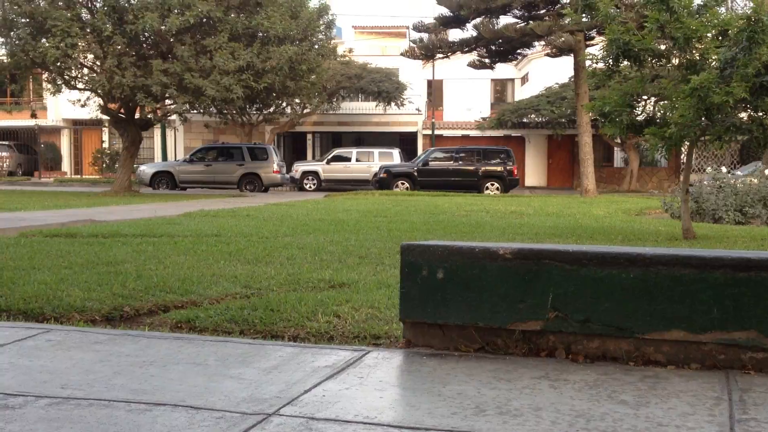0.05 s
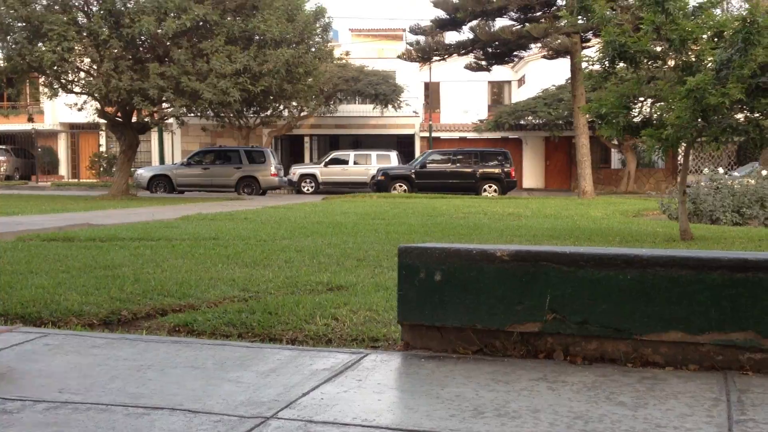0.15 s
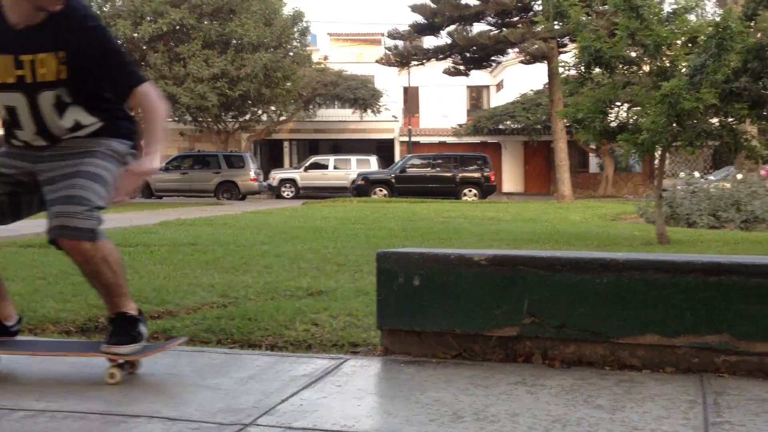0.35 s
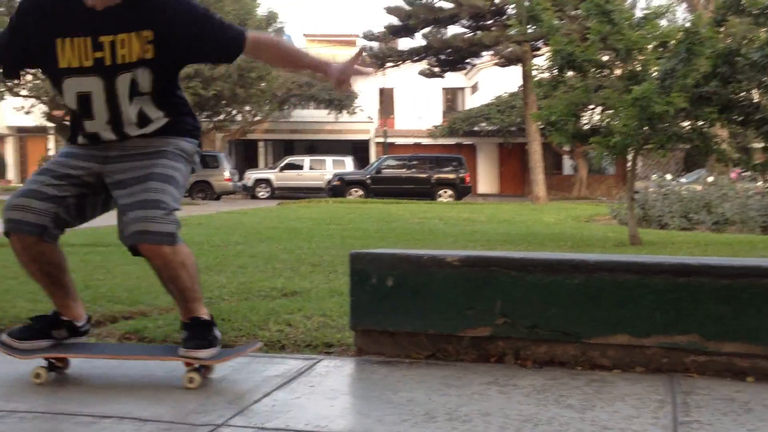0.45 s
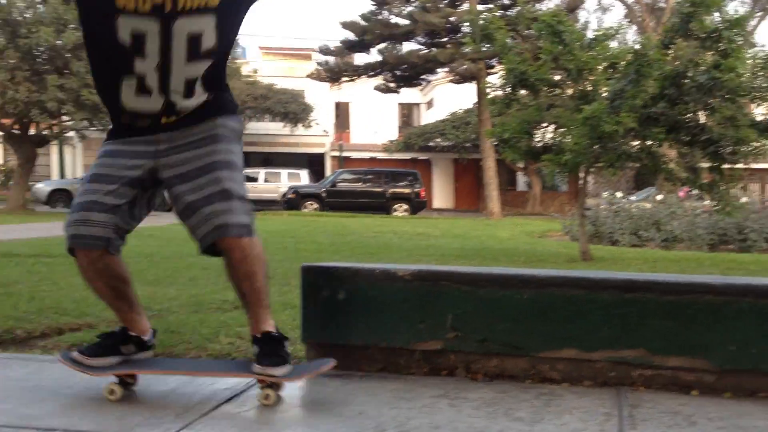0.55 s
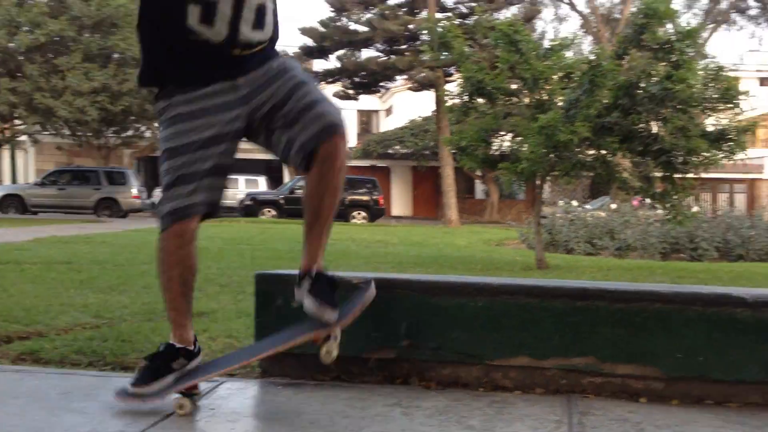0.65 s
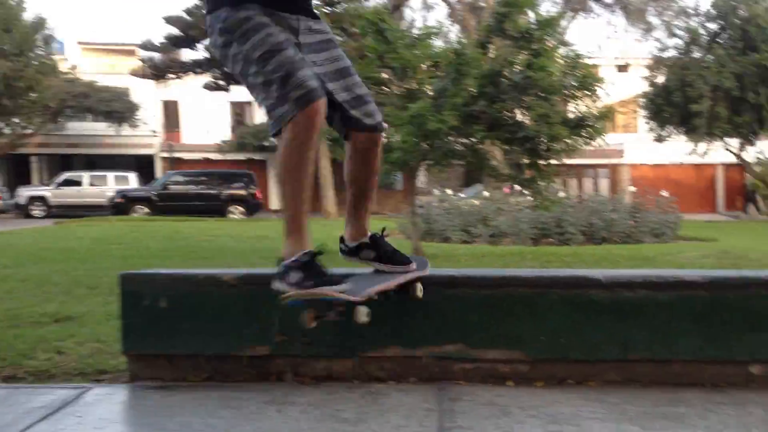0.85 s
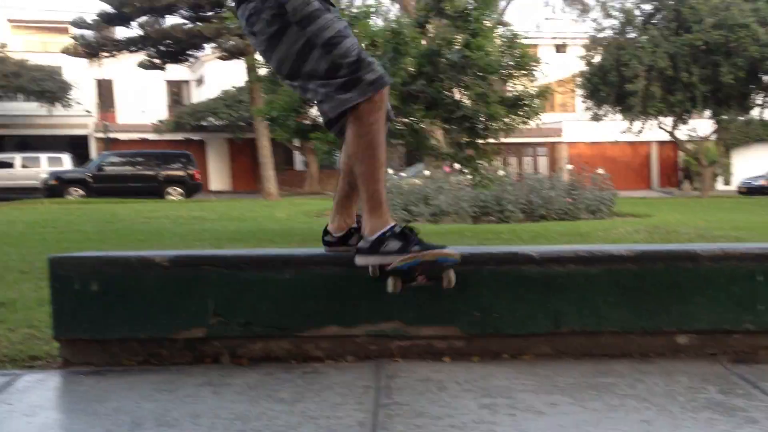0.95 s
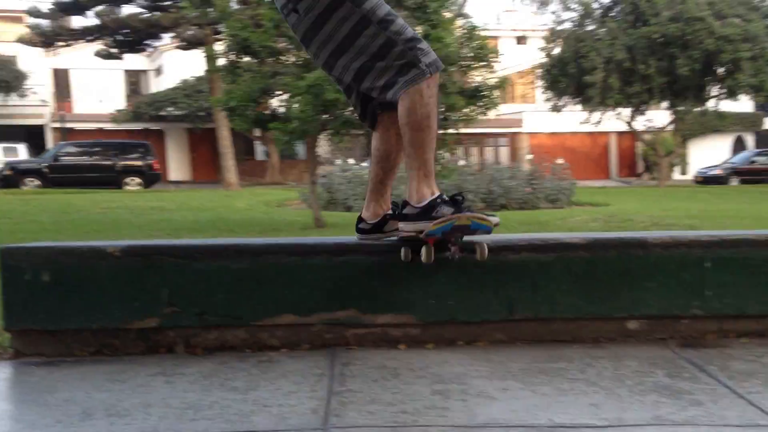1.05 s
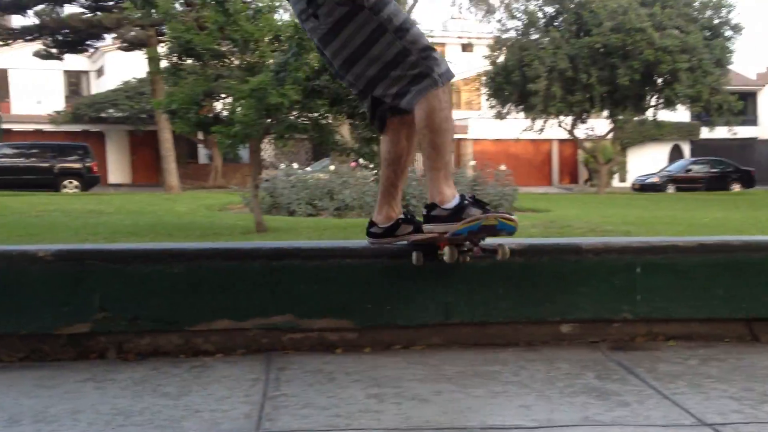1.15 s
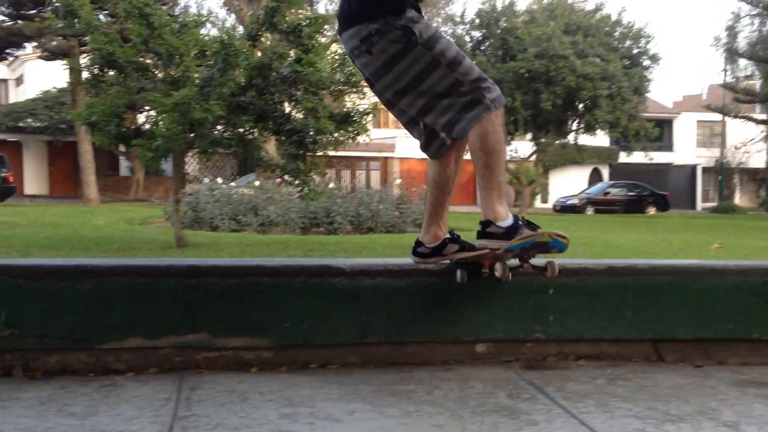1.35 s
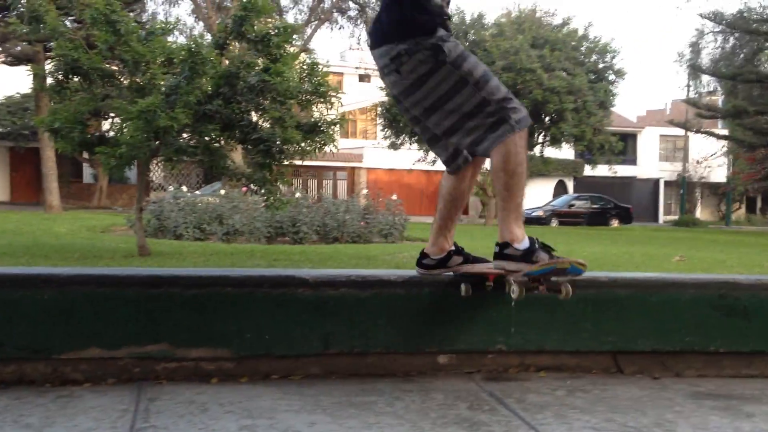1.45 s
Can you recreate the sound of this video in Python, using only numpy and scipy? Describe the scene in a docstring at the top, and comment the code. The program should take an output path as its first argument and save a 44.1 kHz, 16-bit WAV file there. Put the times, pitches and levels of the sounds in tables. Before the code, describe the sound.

Skateboard wheels roar and clack, the board cracks upward and grinds along a ledge.

```python
"""In a quiet park with a few faint, bird-like chirps, a skateboard rolls in over paving slabs.
Its hard wheels roar on the rough stone and clack across the joints, making the wooden deck ring.
The rider stamps on the tail (the back end), which pops on the ground, and the board flies for a moment.
It lands on a concrete ledge and scrapes along it, its trucks (the metal axles) knocking and rattling."""
import sys
import numpy as np
from scipy import signal
from scipy.fft import rfft, irfft, next_fast_len
from scipy.io import wavfile
from scipy.ndimage import map_coordinates

SR = 44100
rng = np.random.default_rng(int(sys.argv[2]) if len(sys.argv) > 2 else 0)


def to_wav(s):
    """Save 16-bit WAV."""
    ch = np.atleast_2d(s).T  # columns
    pcm = np.round(np.clip(ch, -1, 1) * 32767)  # PCM
    wavfile.write(sys.argv[1], SR, pcm.astype(np.int16))


N = 66150
T = np.arange(SR // 2) / SR  # time within one hit or echo, in seconds

# Tone of the park's steady hush: f/Hz, level/dB
PARK_TONE = [(40, -61), (90, -6), (130, -5.5), (240, -9), (340, -26), (450, -32), (600, -12.5),
             (1000, -4.5), (1600, -10), (2100, -4.5), (3500, -14), (5600, -25), (15500, -28)]
# Chirps: t/s, length/s, first f/Hz, last f/Hz, level/dB
CHIRPS = [(0.458, 0.059, 4360, 2370, -54), (1.31, 0.051, 4430, 3320, -58.5),
          (1.443, 0.012, 5340, 5970, -53.5)]
# Fading of the outdoor echo (t60 is the time to fall by 60 dB): f/Hz, t60/s
ECHO_DECAY = [(200, 0.15), (12000, 0.41)]
# Loudness of the wheels' roar and of their low rumble: t/s, level/dB
ROAR_LEVEL = [(0, -47.5), (.12, -45.5), (.3, -43), (.45, -44.5), (.55, -38.5), (.62, -42.5), (.69, -36),
              (.73, -44.5), (.8, -66), (.89, -49.5), (.92, -51)]
RUMBLE_LEVEL = [(0, -49.5), (.1, -53), (.3, -49.5), (.5, -58), (.6, -50.5), (.68, -66)]
# Tone of that roar and rumble: f/Hz, level/dB
ROAR_TONE = [(100, -45), (230, -5.5), (400, -10.5), (560, -2), (750, -5), (950, 0), (1250, -1.5),
             (1650, -1), (2050, -12), (2400, -12), (2800, -21), (4200, -26.5), (5300, -22), (7300, -17.5),
             (13000, -29), (15500, -19)]
RUMBLE_TONE = [(40, -15), (90, -25), (130, -1), (175, 2.5), (240, -8), (330, -19), (700, -59)]
# Loudness of the scrape along the ledge: t/s, level/dB
SLIDE_LEVEL = [(.89, -73), (.91, -37.5), (1.0, -47), (1.03, -50.5), (1.08, -47), (1.23, -44.5), (1.27, -52),
               (1.33, -49), (1.38, -50.5), (1.5, -56.5)]
# Tone of that scrape: f/Hz, level/dB
SLIDE_TONE = [(60, -24), (130, -39), (215, -3.5), (330, -46), (460, -18), (580, 0.5), (850, -17),
              (1300, 0.5), (1700, -1), (2350, 0), (3000, -10), (4850, -25), (6200, -12), (9500, -29),
              (11200, -16.5), (15500, -17)]
# Wheels and trucks hitting concrete:
# t/s, wood level/dB, centre f/Hz, width/octaves, main f/Hz, thump level/dB, rattle level/dB, contact/s
KNOCKS = [ (.1990, -29.5, 1920, 0.29, 762, -48, -48, 0.006),
          (0.2057, -23.5, 1030, 1, 911, -44.5, -37, 0.0026),
          (0.3513, -28, 970, 1.3, 1695, -42, -39.5, 0.0032),
          (0.3578, -26.5, 1000, 0.46, 1745, -46, -41.5, 0.0017),
          (0.5624, -24, 1050, 1.3, 1060, -36.5, -45.5, 0.0024),
          (0.5716, -26, 546, 1.1, 2313, -36.5, -34, 0.0026),
          (0.5946, -32.5, 600, 1.9, 990, -60, -43, 0.0053),
          (0.6062, -37, 1600, 0.73, 2263, -60, -47, 0.017), (0.6876, -30.5, 810, 2, 1163, -67, -34, 0.0041),
          (0.6925, -27, 1460, 0.64, 1334, -54, -35, 0.0089), (0.7, -29.5, 895, 1.7, 1844, -69, -39, 0.012),
          (0.707, -29.5, 1380, 3.2, 1104, -63, -33, 0.018),
          (.9008, -24.5, 1320, 1.1, 814, -69, -40, 0.00076),
          (.9035, -24, 2600, 0.57, 2750, -53, -52, 0.0039),
          (.9170, -25.5, 1350, 1.24, 2367, -38, -41.5, 0.0046),
          (0.9297, -28.5, 696, 2, 632, -33.5, -50, .005),
          (0.9558, -31.5, 1190, 2.7, 1245, -37, -54, 0.0011),
          (.9600, -23.5, 1360, 0.22, 612, -59, -38.5, 0.0048),
          (.9645, -21.5, 1610, 1.65, 1276, -34.5, -39, 0.0053),
          (0.9759, -32, 2430, 1.5, 1370, -40, -41.5, 0.0051),
          (1.0450, -38.5, 1050, 0.66, 1900, -56, -78, 0.0034),
          (1.0920, -27.5, 1480, 1.37, 1930, -75, -33, 0.0044),
          (1.1011, -23.5, 1640, 0.53, 1266, -56.5, -37.5, 0.006),
          (1.167, -32.5, 1560, 0.84, 1287, -69, -39, 0.0065),
          (1.1980, -27.5, 2150, 0.37, 1643, -48, -51, .002),
          (1.2176, -32.5, 1240, 0.87, 1700, -43.5, -50, 0.0068),
          (1.2884, -24.5, 2095, 0.25, 1620, -51, -55, 0.00081),
          (1.2900, -33, 756, 0.39, 2014, -58, -42, 0.0044),
          (1.3218, -42, 1240, 1.5, 1325, -74, -45.5, 0.013),
          (1.4061, -45.5, 900, 0.8, 1360, -62, -57, 0.0051),
          (1.425, -48, 900, 0.64, 2255, -57, -70, 0.0022), (1.471, -49.5, 900, 1.5, 1070, -58, -59, 0.0055)]
# Modes (natural notes) of the deck ringing and bending under the rider: f/Hz, level/dB, t60/s
DECK_MODES = [(463.6, -1.5, 0.062), (588.3, 2, 0.052), (670, -8.5, 0.019), (760, -2, 0.043),
              (968, -3, 0.089), (1063, -1, 0.054), (1259, 6.5, 0.021), (1532, 4, 0.04), (1928, -0.5, 0.032),
              (2055, -6, 0.048), (2317, -3, 0.028), (2463, -2.5, 0.042), (2906, -4, 0.034),
              (3220, -11.5, 0.072)]
BEND_MODES = [(151, -8, 0.072), (230, 11, 0.044), (396, -6.5, 0.053)]
# Tone of the wood's many crowded modes and of the rattling metal: f/Hz, level/dB
WOOD_TONE = [(100, -35), (350, -5), (600, -2), (1600, -2), (2600, -8), (3300, -9.5), (4400, -18),
             (8000, -23)]
METAL_TONE = [(1500, -30), (3500, -8.5), (4800, -10), (6100, 3), (7600, 0), (9500, -2.5), (11300, -2.5),
              (13000, -8), (15500, -5)]
# Modes of the stamped deck, the struck tail and the deck in the air: f/Hz, level/dB, t60/s
STAMP_MODES = [(231.6, -2.5, 0.078), (270, -8.5, 0.11), (367, -10.5, 0.083)]
TAIL_MODES = [(1047, -3, 0.039), (1578, -4, 0.038), (1933, 1, 0.029), (2560, 4.5, 0.019), (2780, -3, 0.018),
              (3285, -3, 0.013)]
FLIGHT_MODES = [(1222, 4, 0.1), (1890, 12.5, 0.045), (2030, -1, 0.12), (2630, -8, 0.052), (3881, -12, 0.21)]
# Tone of the tail's crack and of loose parts shivering in the air: f/Hz, level/dB
CRACK_TONE = [(250, -11), (1100, 3), (2600, 4), (3500, 1.5), (4400, -23), (6500, -2), (10000, -13),
              (15000, -25)]
SHIVER_TONE = [(200, -29), (700, -24), (1200, 4.5), (3500, 3), (5000, -4), (15000, -15)]


def amp(db):
    """Turn decibels into a gain."""
    return 10 ** (np.asarray(db) / 20)


def unit_rms(x):
    """Scale a sound to an average level (rms) of 1."""
    return x / np.sqrt(np.mean(x ** 2) + 1e-20)


def unit_hit(x, knock_s=0.0091):
    """Give a hit the energy of rms 1 held for one knock's length."""
    return x / np.sqrt(np.sum(x ** 2) / (knock_s * SR) + 1e-20)


def value_at(points, hz):
    """Read between (f/Hz, value) points on a log frequency axis."""
    point_hz, values = np.transpose(points)
    return np.interp(np.log(hz + 1), np.log(point_hz + 1), values)


def level_curve(points):
    """A gain for each sample from (t/s, level/dB) points."""
    return amp(np.interp(np.arange(N) / SR, *np.transpose(points)))


def wobble(rate):
    """A smooth curve through `rate` random points a second."""
    return map_coordinates(rng.standard_normal(4096), [np.arange(N) * rate / SR], mode="wrap")


def noise(gain_at, size=N):
    """Noise of rms 1, shaped by a gain for each frequency."""
    spectrum = rfft(rng.standard_normal(size)) * gain_at(np.fft.rfftfreq(size, 1 / SR))
    return unit_rms(irfft(spectrum, size))


def hiss(tone, size=N):
    """Noise shaped by a tone table."""
    return noise(lambda hz: amp(value_at(tone, hz)), size)


def burst(hold_s, t60, attack_s=0.00076):
    """The loudness of one hit: it rises, holds and dies away."""
    return (1 - np.exp(-T / attack_s)) * amp(-60 * np.maximum(T - hold_s, 0) / t60)


def ring(modes, weight=lambda hz: 1, attack_s=0.00076, hold_s=0, scatter_db=1):
    """One fading sine wave per mode, struck a little differently each time."""
    out = np.zeros(len(T))
    for hz, db, t60 in modes:
        gain = weight(hz) * amp(db + scatter_db * rng.standard_normal())
        out += gain * burst(hold_s, t60, attack_s) * np.sin(2 * np.pi * (hz * T + rng.random()))
    return unit_hit(out)


def add(track, start_s, x):
    """Mix a sound into a track at a given time."""
    i = round(start_s * SR)
    track[i:i + len(x)] += x[:N - i]


def park(level_db=-57.5):
    """The soft, steady hush of the park."""
    return amp(level_db) * hiss(PARK_TONE)


def chirps(waver=0.035):
    """Faint whistles that glide and waver in pitch."""
    out = np.zeros(N)
    for start_s, length_s, first_hz, last_hz, db in CHIRPS:
        n = int(length_s * SR)
        hz = np.geomspace(first_hz, last_hz, n) * (1 + waver * wobble(530)[:n])
        whistle = np.sin(2 * np.pi * np.cumsum(hz) / SR)
        add(out, start_s, amp(db) * unit_rms(signal.windows.tukey(n, 0.5) * whistle))
    return out


def echo(x):
    """Sound scatters back from the ledge, trees and houses."""
    hz, t, spectra = signal.stft(rng.standard_normal(len(T)), SR, nperseg=256)
    fade = amp(-60 * t / value_at(ECHO_DECAY, hz)[:, None])
    reflections = signal.istft(spectra * fade, SR, nperseg=256)[1]
    return signal.fftconvolve(x, reflections / np.linalg.norm(reflections))[:N]


def rolling(grit_db=1.5, sway_db=1):
    """Hard wheels roar on rough paving, louder as they come near; in the air they only whirr."""
    roughness = amp(grit_db * wobble(300) + sway_db * wobble(37.3))
    roar = unit_rms(hiss(ROAR_TONE) * roughness)
    return level_curve(ROAR_LEVEL) * roar + level_curve(RUMBLE_LEVEL) * hiss(RUMBLE_TONE)


def sliding(grit_db=2, catch_db=1, sing_hz=6660, sing_width_hz=350, sing_db=-22):
    """The board scrapes unevenly along the ledge, and the truck's metal sings a thin note."""
    sing = noise(lambda hz: 1 / (1 + (2 * (hz - sing_hz) / sing_width_hz) ** 2))
    scrape = hiss(SLIDE_TONE) + amp(sing_db) * sing
    roughness = amp(grit_db * wobble(300) + catch_db * wobble(51.85))
    return level_curve(SLIDE_LEVEL) * unit_rms(scrape * roughness)


def knocks(crowded_db=-1, main_db=-2.5, flicker_db=3.2):
    """Each hit rings the wood, favouring one note; it also bends the deck and shakes the metal."""
    out = np.zeros(N)
    for start_s, wood_db, centre_hz, octaves, main_hz, thump_db, rattle_db, contact_s in KNOCKS:
        # A hit drives the modes near its centre frequency hardest.
        reach = lambda hz: 1 / (1 + (np.log2((hz + 1) / centre_hz) / octaves) ** 2)
        crowded = noise(lambda hz: amp(value_at(WOOD_TONE, hz)) * reach(hz), len(T))
        crowded *= burst(contact_s, t60=0.031)
        body = unit_hit(ring(DECK_MODES, reach) + amp(crowded_db) * unit_hit(crowded))
        main_note = ring([(main_hz, 0, 0.033)], hold_s=contact_s)
        wood = unit_hit(body + amp(main_db) * main_note)
        metal = hiss(METAL_TONE, len(T)) * burst(hold_s=0.0035, t60=0.045)
        rattle = unit_hit(metal * amp(flicker_db * wobble(647)[:len(T)]))
        thump = ring(BEND_MODES, attack_s=0.0041)
        add(out, start_s, amp(wood_db) * wood + amp(thump_db) * thump + amp(rattle_db) * rattle)
    return out


def foot_stamp(start_s=0.686, level_db=-23.5, attack_s=0.0083, low_cut_hz=205):
    """The deck bends under the back foot: a short, low boom just before the pop."""
    out = np.zeros(N)
    t = T - attack_s  # zero at the top of the swell
    swell = np.cos(np.pi / 2 * np.minimum(t / attack_s, 0)) ** 2
    boom = sum(amp(db - 60 * np.maximum(t, 0) / t60) * np.sin(2 * np.pi * hz * t)
               for hz, db, t60 in STAMP_MODES)
    # The narrow deck gives off little deep bass.
    low_cut = signal.butter(6, low_cut_hz, "high", fs=SR, output="sos")
    add(out, start_s, amp(level_db) * unit_hit(signal.sosfilt(low_cut, swell * boom)))
    return out


def tail_pop(start_s=0.7176, crack_db=-24.5, shiver_db=-29.5, tail_db=-23.5, flight_db=-30.5):
    """The tail cracks on the ground, then the deck rings in the air and its loose parts shiver."""
    out = np.zeros(N)
    crack = unit_hit(hiss(CRACK_TONE, len(T)) * burst(hold_s=0.004, t60=0.021))
    shiver = unit_hit(hiss(SHIVER_TONE, len(T)) * burst(hold_s=0, t60=0.13))
    ringing = amp(tail_db) * ring(TAIL_MODES) + amp(flight_db) * ring(FLIGHT_MODES)
    add(out, start_s, amp(crack_db) * crack + ringing + amp(shiver_db) * shiver)
    return out


def scene(echo_db=-17):
    """Board and park in one channel; only the hits get an echo."""
    hits = knocks() + foot_stamp() + tail_pop()
    return (hits + amp(echo_db) * echo(hits) + rolling() + sliding() + chirps() + park())[None]


def record(dry, low_cut_hz=95, top_hz=15500):
    """The microphone weakens the deep bass and drops the very highest treble."""
    thinned = signal.sosfilt(signal.butter(2, low_cut_hz, "high", fs=SR, output="sos"), dry)
    size = next_fast_len(N + SR // 2)
    in_range = np.fft.rfftfreq(size, 1 / SR) < top_hz
    return irfft(rfft(thinned, size) * in_range, size)[:, :N]


dry = scene()
out = record(dry)
to_wav(out)
```